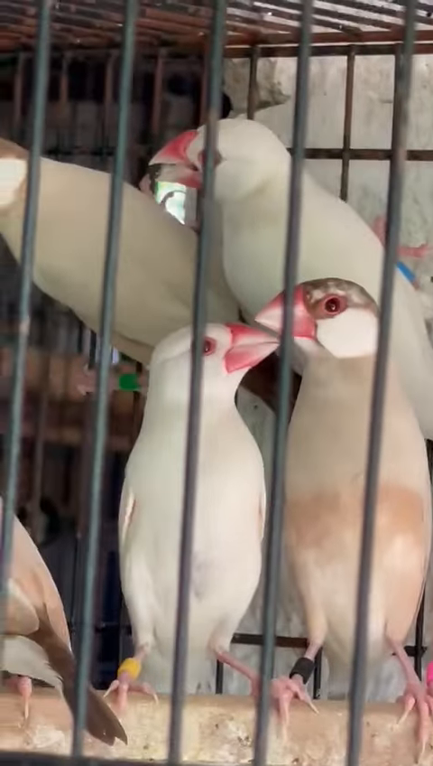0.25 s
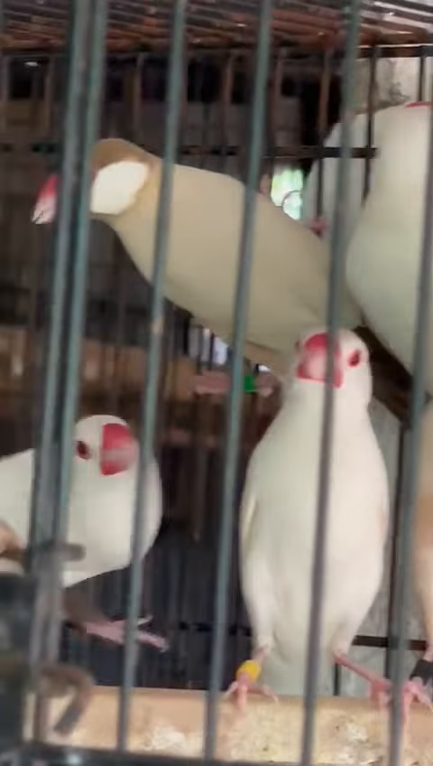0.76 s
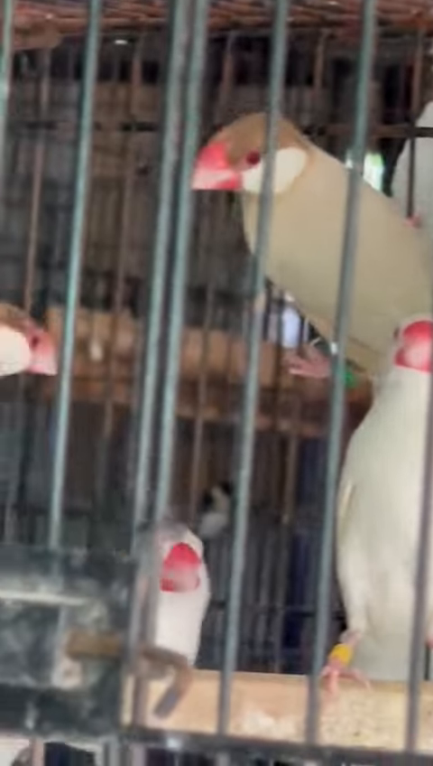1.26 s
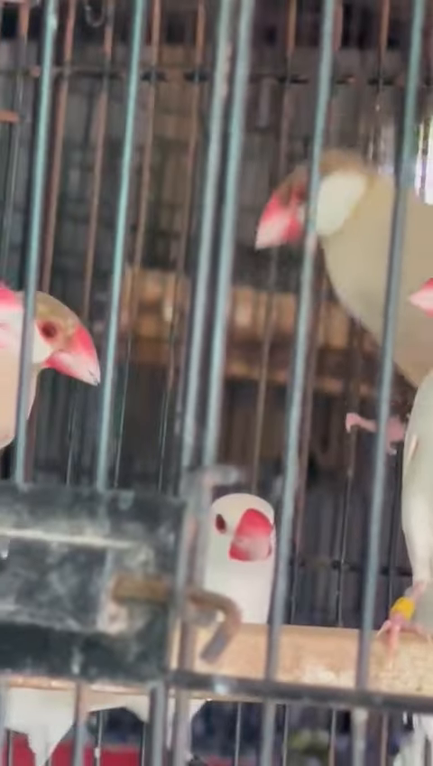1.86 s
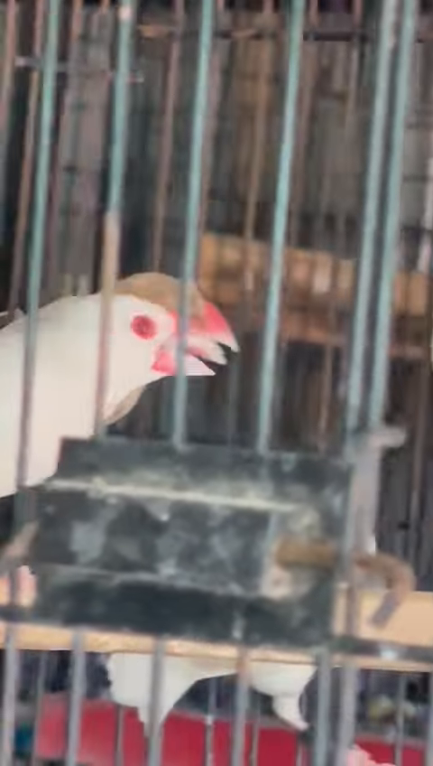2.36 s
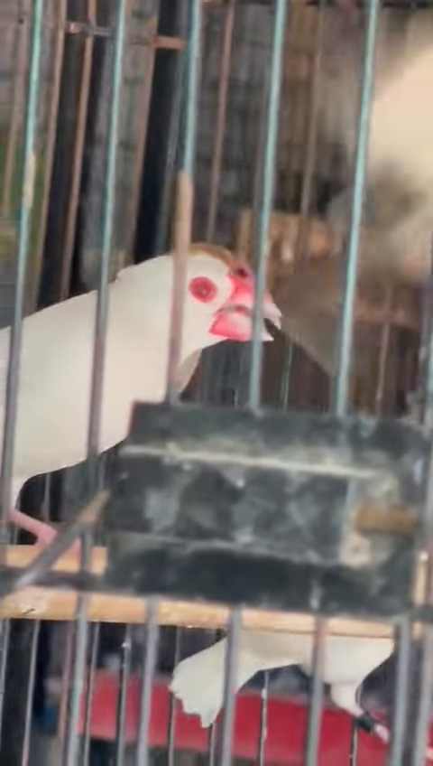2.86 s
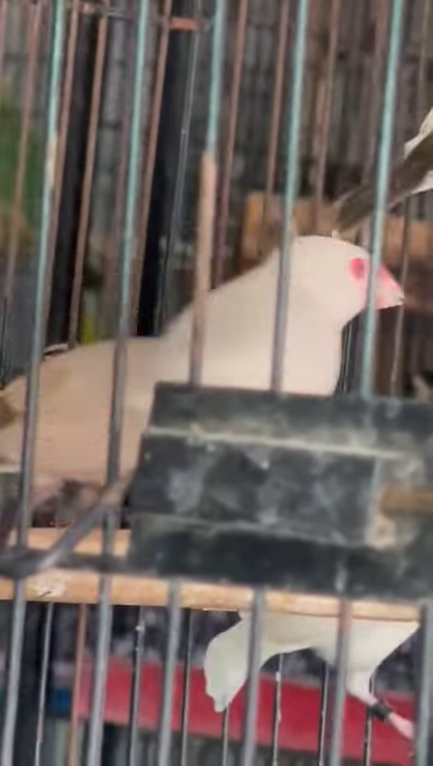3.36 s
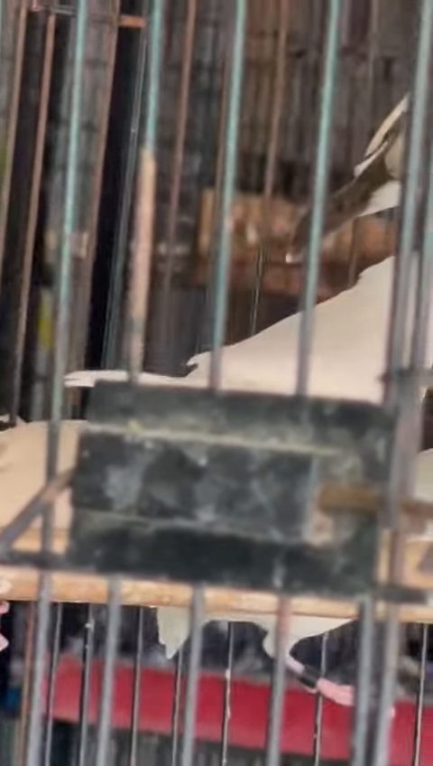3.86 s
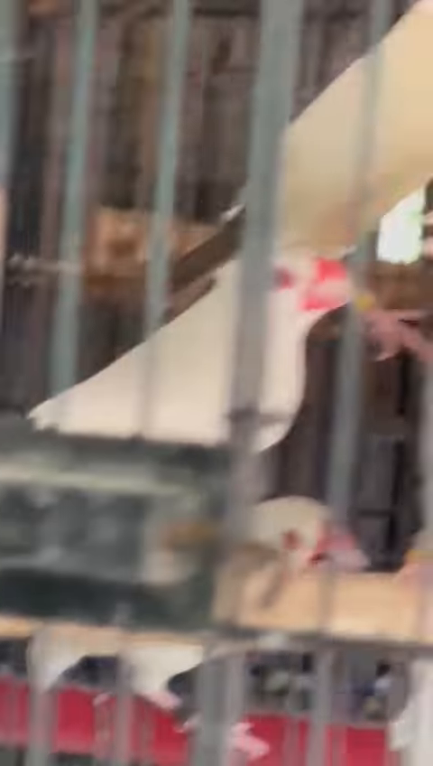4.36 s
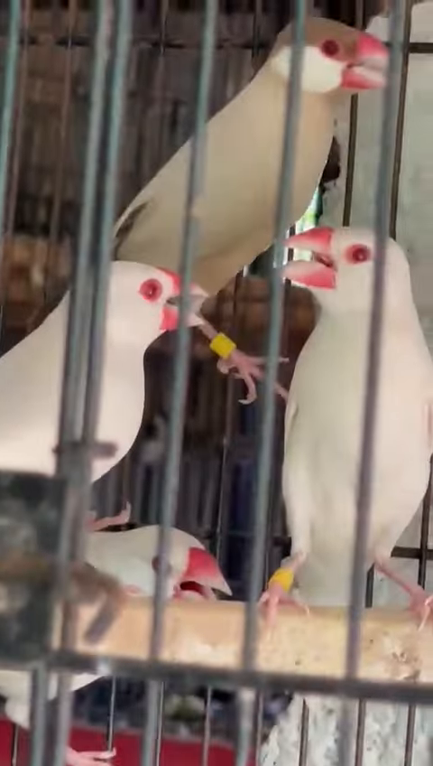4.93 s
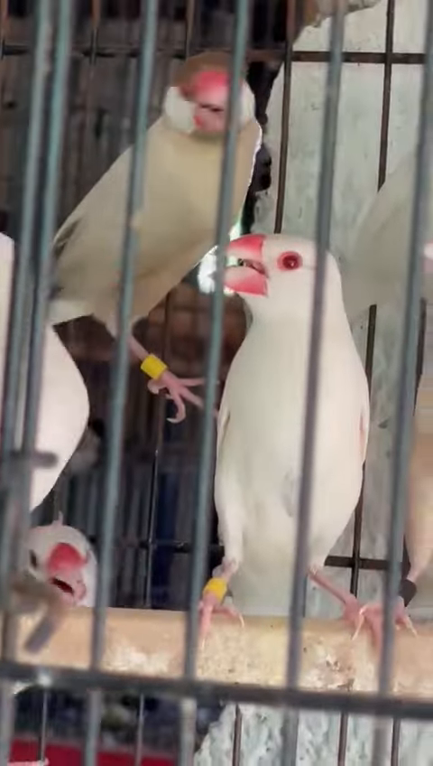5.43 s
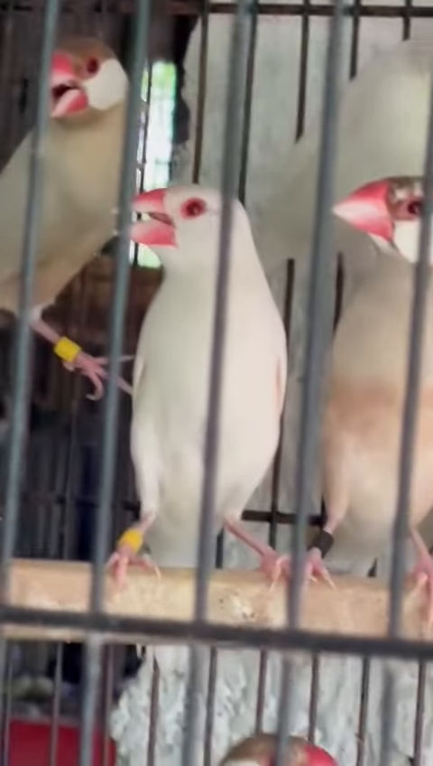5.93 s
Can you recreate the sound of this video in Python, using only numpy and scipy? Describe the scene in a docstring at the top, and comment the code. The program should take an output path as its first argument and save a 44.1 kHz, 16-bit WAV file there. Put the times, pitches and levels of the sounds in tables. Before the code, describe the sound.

Throughout, a low fan hum with a second machine beating gently against it sits under soft, dull moving air in a hard-walled indoor space. At 0.03 s a claw ticks on wire, and very faint high squeals follow until about 0.4 s. From 0.45 to 0.75 s one finch scolds with a rough rattling buzz. A quieter gap holds two foot ticks near 1.2 s, then tiny chips from 1.5 to 2 s. At 2.0 and 2.3 s come the loudest calls, bright squeals that hold and slide downward. Small chips, low peeps and a tick fill 2.5 to 3 s. Hoarse falling squeals repeat at 3.3, 3.6 and 3.8 s, then crowd into raspy chatter from 4 to 5.3 s, strongest near 5.1. After a sparse pause, short squeaks return near 5.65 and 5.9 to 6.2 s. Echoes are brief; the phone pickup is close, with its gain dipping under loud calls.

```python
"""Finches in a wire cage in a hard-walled hall. Throughout: a fan and a second machine hum (wandering harmonics)
over moving air (shaped noise). First feet tick on the bars (noise bursts, again later) and faint notes squeal; then one
scold buzzes (pulses through resonances), then short chips (pitch arches). From 2 s on: two-voiced falling squeals
(held note, then slide; harmonics plus rasping noise), with a few more chips and ticks.
A phone with two microphone ports and gain control listens."""
import sys
import numpy as np
from scipy import signal
from scipy.fft import rfft, irfft, next_fast_len
from scipy.io import wavfile
from scipy.ndimage import uniform_filter1d

SR = 44100
rng = np.random.default_rng(int(sys.argv[2]) if len(sys.argv) > 2 else 0)


def file_out(sig):
    """Save sig as 16-bit WAV at sys.argv[1]."""
    # one column per channel
    cols = np.atleast_2d(sig).T
    # limit, then scale
    lim = np.clip(cols, -1, 1)
    pcm = np.round(lim * 32767).astype(np.int16)
    wavfile.write(sys.argv[1], SR, pcm)


N = 272979
T = np.arange(N) / SR


def amp(db):
    """Decibels to gain."""
    return 10 ** (np.asarray(db) / 20)


def rms_one(x):
    """Scale to rms 1."""
    return x / np.sqrt(np.mean(x ** 2) + 1e-20)


def at_hz(points, hz):
    """Read a spectrum on a log-frequency axis."""
    p = np.array(points)
    return np.interp(np.log(np.maximum(hz, 1)), np.log(np.maximum(p[:, 0], 1)), p[:, 1])


def drift(rate_hz, size=N):
    """Slow random signal of rms 1: noise through two equal low-pass poles."""
    r = np.exp(-2 * np.pi * rate_hz / SR)
    noise = rng.standard_normal(size + 9000)
    return rms_one(signal.lfilter([1], [1, -2 * r, r * r], noise)[9000:])   # filter settles first


def shaped(x, gain):
    """Filter by a gain given as a function of frequency."""
    size = next_fast_len(N + 4096)
    return irfft(rfft(x, size) * gain(np.fft.rfftfreq(size, 1 / SR)), size)[:N]


def hum(base_hz, partials, waver_rad=0.37, throb_db=1.5):
    """Multiples of the turning rate share one wandering phase; each swells on its own."""
    phase = 2 * np.pi * base_hz * T + waver_rad * drift(1.89)
    return sum(amp(db + throb_db * drift(4.7)) * np.sqrt(2) * np.sin(k * phase + k * k) for k, db in partials)


def fan():
    """Hum of a fan at its turning rate and multiples."""
    # Fan harmonics. Each row: multiple of the turning rate, rms level in dB before swelling.
    partials = [(1, -35.5), (2, -47), (3, -42), (4, -47.5), (5, -49), (6, -49)]
    return hum(63.8, partials)


def second_machine():
    """Hum of a slower machine, beating against the fan."""
    # Machine harmonics. Each row: multiple of the turning rate, rms level in dB before swelling.
    partials = [(1, -49), (2, -42)]
    return hum(58.9, partials)


def air(patchy_db=0.5):
    """Moving air and far traffic as shaped noise: a part both ports share and a weaker part that differs."""
    # Air spectrum. Each row: frequency in Hz, relative density in dB per Hz.
    spectrum = [(25, -28), (45, -12), (64, 2), (110, -2), (155, -8.5), (200, -5.5), (400, -12.5),
                (1000, -21), (1900, -23), (3000, -30), (4000, -35.5), (6500, -35), (9300, -44),
                (10600, -35.5), (11500, -26)]
    # Air the ports do not share. Each row: frequency in Hz, level against the shared air in dB.
    spread = [(100, -49), (250, -22), (600, -15), (1200, -6.5), (1700, -8.5), (2200, -70), (5000, -81)]
    air_db = -31.5   # rms of the shared part

    def shared_gain(hz):
        return amp(at_hz(spectrum, hz))

    def apart_gain(hz):
        return amp(at_hz(spectrum, hz) + at_hz(spread, hz))
    scale = 1 / np.std(shaped(rng.standard_normal(N), shared_gain))
    shared = shaped(rng.standard_normal(N), shared_gain)
    apart = shaped(rng.standard_normal(N), apart_gain)
    return scale * amp(air_db + patchy_db * drift(0.94)) * np.array([shared, apart])


def ticks():
    """Claws snap on wire: a short bright burst of decaying noise."""
    # Feet on the bars. Each row: start in seconds, starting noise level in dB before the high-pass.
    steps = [(0.031, -28.5), (1.142, -29.5), (1.226, -25), (2.803, -26.5), (4.922, -42)]
    t60_s, low_hz = .018, 2200
    out, t = np.zeros(N), np.arange(900) / SR
    for s, start_db in steps:
        at = int(s * SR)
        out[at:at + 900] += amp(start_db - 60 * t / t60_s) * rng.standard_normal(900)
    return signal.sosfilt(signal.butter(2, low_hz, "high", fs=SR, output="sos"), out)


def voice(pitch_hz, level_db, rough, bright_db, beak_hz):
    """A membrane of the syrinx: harmonics through throat and beak; roughness shakes them and lets air rasp."""
    # What windpipe and beak let through. Each row: frequency in Hz, gain in dB.
    throat = [(750, -1.5), (1100, -2), (1400, -8.5), (1700, -7), (2500, 3), (3400, 0.5), (4300, 0),
              (5300, -5.5), (6500, -11), (8000, -6), (9700, -18.5), (11000, -3)]
    beak_db, beak_octaves = 6.5, 0.18   # height and width of the beak resonance
    held_unrest, full_glide_octaves_s = .5, 8   # unrest of held notes, glide that adds full unrest
    wobble, shake_db = .055, 6.5   # pitch wobble per unrest, flutter of each harmonic
    half_lines = .7   # strong-weak alternation of cycles at full roughness
    rasp_share, rasp_bright_db = 1.35, 2   # the rasp is brighter per octave than the tone
    rattle_db, rattle_hz = 6, 200   # uneven throbbing
    n = len(pitch_hz)

    def colour(hz, bright_db):
        """Gain of throat, brightness and beak."""
        beak = beak_db * np.exp(-(np.log2(hz / beak_hz + 0.0012) / beak_octaves) ** 2)
        return amp(at_hz(throat, hz) + bright_db * np.log2(hz / 3400 + 0.00053) + beak)

    glide_octaves_s = uniform_filter1d(np.abs(np.gradient(np.log2(pitch_hz))) * SR, size=600)
    # held notes are clearer, glides hoarser
    unrest = rough * np.clip(held_unrest + glide_octaves_s / full_glide_octaves_s, 0, 1.2)
    phase = 2 * np.pi * np.cumsum(pitch_hz * (1 + wobble * unrest * drift(354, size=n))) / SR

    tone = np.zeros(n)
    for k in range(1, 16):
        gain = (k * pitch_hz < 12000) * colour(k * pitch_hz, bright_db)
        flutter = amp(shake_db * np.sqrt(max(rough, 0)) * drift(104, size=n))
        tone += gain * np.sin(k * phase + k * k) * flutter
    tone = tone * (1 + half_lines * rough ** 2 * drift(28, size=n) * np.sin(phase / 2))

    air_hz = np.fft.rfftfreq(n, 1 / SR)
    rasp_gain = colour(air_hz, np.max(bright_db) + rasp_bright_db) * (air_hz > .75 * pitch_hz.min())
    rasp = irfft(rfft(rng.standard_normal(n)) * rasp_gain, n)

    edge_s = .001 + .016 * rough
    edge = np.clip(np.minimum(np.arange(n), n - np.arange(n)) / (edge_s * SR), 0, 1)
    rattle = amp(rattle_db * rough * drift(rattle_hz, size=n))
    mix = rms_one(tone) * rattle + rasp_share * unrest * rms_one(rasp)
    return rms_one(mix) * edge * amp(level_db)


def held(s, length_s, pitch_hz, end_hz, level_db, change_db, rough, bright_db, echo_db, beak_hz):
    """A note of one membrane on a straight line of pitch and level."""
    u = np.linspace(0, 1, int(length_s * SR))
    line_hz = pitch_hz + (end_hz - pitch_hz) * u
    return s, echo_db, voice(line_hz, level_db + change_db * u, rough, bright_db, beak_hz)


def scold(breathy=0.27):
    """Slow uneven pulses, each opening a puff of air, ring in throat resonances that move with the beak."""
    # Course of the scold. Each row: time in seconds, level in dB, mean pulse rate in Hz, throat pitch factor.
    course = [(0.45, -54, 240, 0.84), (.476, -34, 250, 0.99), (0.492, -30.5, 230, 0.99),
              (.54, -32.5, 150, 1.01), (0.601, -29.5, 160, 0.94), (0.649, -33, 160, 0.842),
              (0.698, -39, 130, 0.79), (0.721, -58, 192, 0.84), (.8, -64, 110, 1.3)]
    # Throat resonances. Each row: frequency in Hz at factor 1, width in Hz of one filter pass, gain in dB.
    modes = [(1970, 270, -11), (2740, 780, -8), (3850, 290, -1.5), (4500, 580, -2), (5160, 560, -4),
             (6270, 1300, -15), (8000, 990, -12), (10400, 1800, -9)]
    s, level_db, rate_hz, factor = np.transpose(course)
    t = np.arange(s[0], s[-1], 1 / SR)
    turns = np.cumsum(np.interp(t, s, rate_hz) * (1 + 0.2 * drift(60, size=len(t)))) / SR
    pulses = np.diff(np.floor(turns), prepend=0)
    puffs = np.exp(-3.0 * (turns % 1)) * rng.standard_normal(len(t))
    source = 2.6 * pulses * (1 - breathy) + breathy * puffs

    buzz = np.zeros(len(t))
    for k, (hz, width_hz, mode_db) in enumerate(modes):
        r, state = np.exp(-np.pi * width_hz / SR), np.zeros((2, 2))
        for i in range(0, len(t), 256):   # retuned block by block
            w = 2 * np.pi * hz * np.interp(t[i], s, factor) / SR
            section = [(1 - r * r) / 2, 0, (r * r - 1) / 2, 1, -2 * r * np.cos(w), r * r]
            part, state = signal.sosfilt([section] * 2, source[i:i + 256], zi=state)   # twice: deep valleys
            buzz[i:i + 256] += (-1) ** k * amp(mode_db) * part
    out, at = np.zeros(N), int(s[0] * SR)
    out[at:at + len(t)] = rms_one(buzz) * amp(np.interp(t, s, level_db))
    return out


def chip(s, level_db, top_hz, length_s, echo_db):
    """A short arch of pitch; the longer ones are hoarse and duller."""
    arch_depth, beak_hz = .24, 3260
    clear_s, hoarse_s = .018, .026   # shorter chips are clear, longer ones hoarse
    clear_rough, hoarse_rough = 0.0065, 0.75
    u = np.linspace(-1, 1, int(length_s * SR))
    hoarse = np.interp(length_s, [clear_s, hoarse_s], [0, 1])
    rough = clear_rough + (hoarse_rough - clear_rough) * hoarse
    bright_db = -0.5 - 4 * hoarse   # per octave
    pitch_hz = top_hz * (1 - arch_depth * u ** 2)
    return s, echo_db, voice(pitch_hz, np.full(len(u), level_db), rough, bright_db, beak_hz)


def slide(s, length_s, start_hz, rest_hz, end_hz, drop_s, rest_s, level_db, hold_s, end_db,
          rough, echo_db, beak_hz):
    """The other membrane drops fast, rests, sags as air runs out; level holds, then fades; effort brightens."""
    drop_bend, accent_db = 1.6, 1   # steep start with soft landing, push at the start of the drop
    mid_bright_db, effort_db, bright_per_db = 3, -22, 0.4756   # dB per octave at this level, gain per dB
    fade_dull_db = 5.5   # brightness per octave lost in the fade
    t = np.arange(int(length_s * SR)) / SR
    drop = np.clip(1 - t / drop_s, 0, 1) ** drop_bend
    sag = np.clip((t - rest_s) / max(length_s - rest_s, .001), 0, 1)
    fade = np.clip((t - hold_s) / max(length_s - hold_s, .001), 0, 1)
    pitch_hz = rest_hz + (start_hz - rest_hz) * drop + (end_hz - rest_hz) * sag
    bright_db = mid_bright_db + bright_per_db * (level_db - effort_db) - fade_dull_db * fade
    course_db = level_db + accent_db * drop + (end_db - level_db) * fade
    return s, echo_db, voice(pitch_hz, course_db, rough, bright_db, beak_hz)


def birds():
    """All squeals and chips: the direct sound and what feeds the hall."""
    # Held notes of one membrane. Each row: start in seconds, length in seconds, pitch in Hz, end pitch in Hz,
    # level in dB, level change in dB, roughness 0-1, brightness in dB per octave, echo send in dB,
    # beak resonance in Hz.
    held_notes = [(0.052, 0.059, 3870, 3670, -48, -3, 0.27, -22, -3, 3800),
                  (0.074, 0.16, 4460, 4000, -44, -12, 0.4, -22, -7, 4900),
                  (0.169, 0.074, 3440, 3290, -47.5, -5, 0.1, -25, 1, 3400),
                  (.372, 0.039, 3010, 2964, -49, -3, .45, -15, -3, 3000),
                  (2.01, 0.048, 3315, 3230, -28.5, 3, 0.24, 0.5, 7.5, 2830),
                  (2.297, 0.065, 3317, 3490, -23, 0, 0.17, -2, 7.5, 1640),
                  (2.544, 0.06, 1115, 1045, -35, -0.5, .15, 0.5, -3.5, 2110),
                  (2.733, 0.075, 773, 680, -35.5, -9, 0.44, -4, -0.5, 2140),
                  (3.262, 0.058, 2686, 2580, -35, -2.5, 0.46, 8, 7.5, 6000),
                  (3.559, 0.053, 2720, 2587, -34.5, -2.5, 0.46, 3, 2, 4700),
                  (3.795, 0.051, 1908, 1737, -32, 2, 0.4, -1, 4, 5300),
                  (4.045, 0.088, 2430, 2347, -45, 7, 0.83, 3.5, 3.5, 2360),
                  (4.135, 0.067, 3660, 3330, -42, 1, 0.8, -7, -3, 3500),
                  (4.39, 0.03, 3650, 3530, -36.5, -3, 0.58, -11, 4, 3500),
                  (4.194, 0.08, 3960, 3580, -40.5, -7, 0.63, 2, 0.5, 3700),
                  (4.453, 0.078, 3780, 3060, -36, -6, 0.57, -10, 0, 3640),
                  (4.579, 0.093, 1500, 1757, -44, -3, 0.32, -9, -4, 3200),
                  (4.315, 0.04, 3435, 3100, -39.5, -9, 0.37, -8, 4, 3600),
                  (4.377, 0.033, 2317, 2240, -34.5, -2, 0.47, 2, 3.5, 2450),
                  (4.8, 0.22, 3350, 3130, -39.5, -13, 0.74, -12, -13, 3360),
                  (4.868, 0.07, 1494, 1853, -41, -8, 0.36, -5.5, 7, 4500),
                  (4.92, 0.062, 1826, 1790, -40, 11, 0.23, -5.5, 0.5, 3670),
                  (5.002, 0.041, 3670, 3550, -41, -4, 0.4, -12, 9, 3600),
                  (5.056, 0.039, 1767, 1825, -34.5, -1, 0.47, -0.5, 8, 3700),
                  (5.06, 0.067, 1500, 1500, -37, -2, 0.4, 3, 1.5, 3000),
                  (5.122, 0.054, 1653, 1420, -43, -1, 0.27, 3, -7, 3200),
                  (5.167, 0.08, 1404, 1520, -46, 4, 0.5, -8, 7, 1450),
                  (5.201, 0.054, 1834, 1788, -37, -0.5, 0.67, -0.5, 10, 5400),
                  (5.635, 0.034, 980, 972, -44, 0, 0.2, 2, -3, 3950),
                  (5.654, .075, 2000, 2090, -39.5, -2.5, 0.53, -17, -1.5, 4100),
                  (5.827, 0.058, 1536, 1880, -51, 0, 0.54, -7, -3, 3420),
                  (5.9, 0.089, 1669, 1695, -38.5, 6.5, 0.09, -2.5, 8, 5050),
                  (6.045, 0.047, 1426, 1795, -37.5, 4.5, 0.28, -9, -4, 3300),
                  (6.077, 0.062, 1790, 1862, -45.5, -3, 0.5, -11, 10, 3700)]
    # Slides of the other membrane. Each row: start in seconds, length in seconds, start, rest and end pitch
    # in Hz, drop time in seconds, sag onset after start in seconds, level in dB, hold in seconds, end level
    # in dB, roughness 0-1, echo send in dB, beak resonance in Hz.
    slides = [(2.038, 0.097, 2716, 1875, 1754, 0.066, 0.079, -18, 0.11, -26, 0.14, 6, 4050),
              (2.32, 0.23, 2505, 1680, 1096, 0.036, 0.092, -16.5, 0.098, -37.5, 0.16, 3, 3480),
              (3.304, 0.16, 1944, 1548, 1303, 0.027, 0.071, -27, 0.058, -47, 0.68, -1.5, 3920),
              (3.589, 0.18, 1983, 1578, 1370, 0.033, 0.052, -30, 0.072, -41.5, 0.58, -3, 4100),
              (3.831, 0.17, 1767, 1534, 1308, 0.039, 0.049, -30.5, 0.097, -37, 0.78, -3.5, 3720),
              (3.822, 0.068, 1844, 1330, 1280, .028, 0.053, -33.5, 0.027, -49, 0.1, -3, 2880),
              (4.119, 0.17, 1558, 1391, 1362, 0.024, 0.042, -31.5, 0.047, -46, 0.54, -5, 3070),
              (4.408, 0.12, 1663, 1350, 1102, 0.027, 0.037, -31, 0.021, -52, 0.44, -6.5, 3140),
              (4.667, 0.067, 1740, 1645, 1335, 0.0203, 0.0191, -34, 0.05, -45, 0.3, 1.5, 3380),
              (4.968, 0.093, 1846, 1490, 1416, 0.05, 0.058, -31.5, 0.025, -35.5, 0.65, 0, 4730),
              (5.089, 0.1, 1930, 1684, 1468, 0.0172, 0.0404, -25, 0.021, -37, 0.6, -2.5, 5300),
              (5.235, 0.1, 1840, 1458, 1280, 0.027, 0.0297, -37, 0.032, -52, 0.71, 6.5, 3120),
              (5.979, 0.076, 1720, 1462, 1410, 0.038, 0.017, -25, 0.018, -48.5, 0.23, 0.5, 3120),
              (6.113, 0.084, 1870, 1833, 1416, 0.0066, 0.014, -36.5, 0.073, -32, 0.17, 6.5, 5100)]
    # Chips. Each row: start in seconds, level in dB, top pitch in Hz, length in seconds, echo send in dB.
    chips = [(1.479, -42.5, 1896, 0.058, 2.5), (1.577, -26.5, 1814, 0.015, -5.5),
             (1.744, -28.5, 1810, 0.02, -4), (1.792, -41, 1656, 0.01, -4),
             (1.802, -45.5, 1967, 0.079, -3.5), (1.964, -22.5, 1847, 0.0061, -7),
             (2.652, -38.5, 1960, 0.038, 4.5), (2.809, -42.5, 1880, 0.049, 2.5),
             (2.972, -26.5, 1750, 0.021, -9.5), (3.469, -36, 1603, 0.028, -4),
             (4.777, -33, 1554, 0.021, -6)]
    direct, sent = np.zeros(N + SR), np.zeros(N + SR)
    calls = [held(*r) for r in held_notes] + [slide(*r) for r in slides] + [chip(*r) for r in chips]
    for s, echo_db, call in calls:
        at = int(s * SR)
        direct[at:at + len(call)] += call
        sent[at:at + len(call)] += amp(echo_db) * call
    return direct[:N], sent[:N]


def hall(x):
    """Dense noise echoes dying away, the treble first; a weaker, longer tail comes from the far walls."""
    t60_s, treble_t60_s, gap_s, split_hz = .24, .2, .003, 5500
    late_t60_s, late_db = 0.5, -16
    t = np.arange(SR) / SR
    low, high = rng.standard_normal((2, SR)) * (t > gap_s)
    low = signal.sosfilt(signal.butter(2, split_hz, fs=SR, output="sos"), low)
    low = low * (amp(-60 * t / t60_s) + amp(late_db - 60 * t / late_t60_s))
    high = signal.sosfilt(signal.butter(2, split_hz, "high", fs=SR, output="sos"), high)
    high = high * amp(-60 * t / treble_t60_s)
    echoes = low + high
    return signal.fftconvolve(x, echoes / np.linalg.norm(echoes))[:N]


def scene():
    """One sound field reaches both ports, plus air and echoes of opposite sign at each."""
    hall_db, hall_apart_db = -2, -18   # all echoes, echoes that differ between the ports
    direct, sent = birds()
    buzz, snaps = scold(), ticks()
    shared, apart = air()
    sent = amp(hall_db) * (sent + amp(6) * buzz + amp(-10.0) * snaps)
    apart = apart + amp(hall_apart_db) * hall(sent)
    field = direct + buzz + snaps + hall(sent) + fan() + second_machine() + shared
    return np.array([field + apart, field - apart])


def record(dry):
    """The ports differ in phase and level; gain sinks under loud calls; the top is cut."""
    # Phase between ports. Each row: frequency in Hz, lead of the left port in radians.
    port_phase = [(0, 0), (1120, 0), (1460, -.3), (2670, .5), (4050, .45), (4570, 1.7), (5250, 5.3),
                  (5510, 6.3), (6550, 6.3), (7920, 9.1), (9400, 9.5), (10200, 10.3), (11000, 11.5),
                  (11400, 12.6)]
    # Level between ports. Each row: frequency in Hz, left minus right in dB.
    port_balance = [(130, 0.0), (350, -1.5), (700, -1.5), (1500, 1.2), (2200, 0.0)]
    knee_db, slope, release_db_s, attack_s = -23, 0.5, 57, 0.058   # slope: dB cut per dB over the knee
    cutoff_hz = 11900
    hz, lead_rad = np.transpose(port_phase)

    def port(x, side):
        """Give one port its half of the differences."""
        return shaped(x, lambda f: amp(side * at_hz(port_balance, f))
                      * np.exp(1j * side * np.interp(f, hz, lead_rad)))

    ports = np.array([port(x, side) for x, side in zip(dry, (.5, -.5))])
    level_db = 10 * np.log10(uniform_filter1d(np.mean(ports ** 2, axis=0), size=2000) + 1e-12)
    # peak level, falling at the release rate
    held_db = np.maximum.accumulate(level_db + release_db_s * T) - release_db_s * T
    cut_db = slope * np.maximum(held_db - knee_db, 0)
    r = np.exp(-1 / (attack_s * SR))
    steady = ports * amp(-signal.lfilter([1 - r], [1, -r], cut_db))
    return signal.sosfilt(signal.cheby2(12, 70, cutoff_hz, fs=SR, output="sos"), steady)


dry = scene()
out = record(dry)
file_out(out)
```